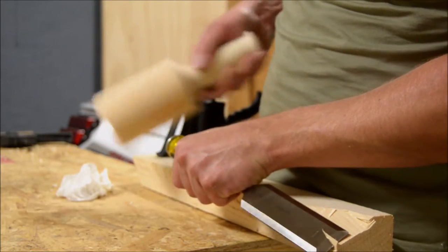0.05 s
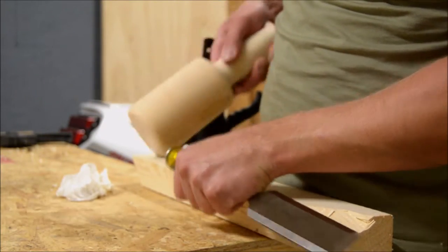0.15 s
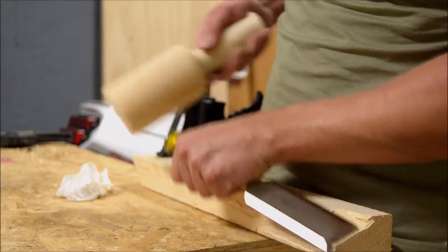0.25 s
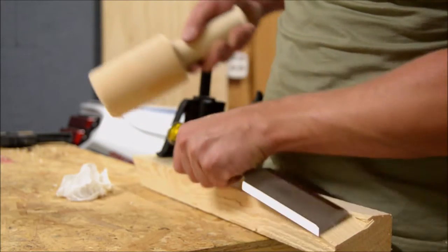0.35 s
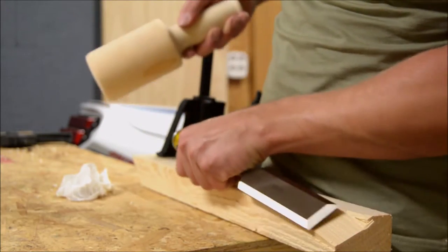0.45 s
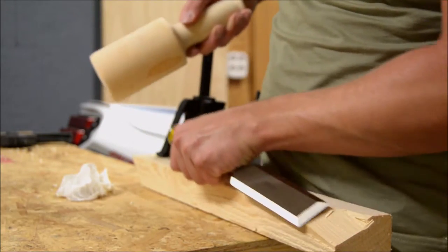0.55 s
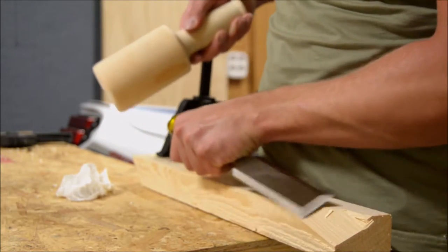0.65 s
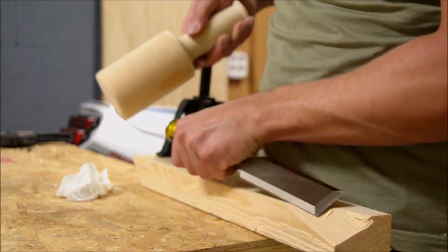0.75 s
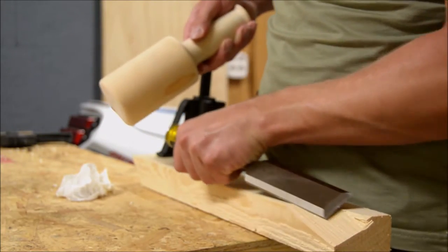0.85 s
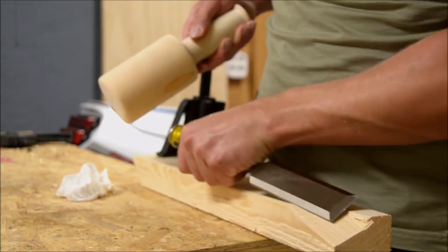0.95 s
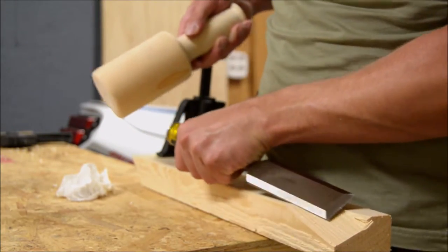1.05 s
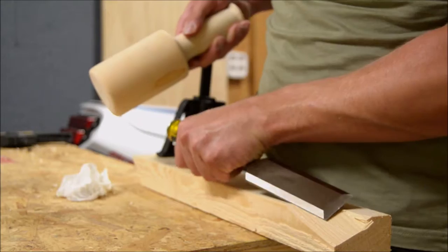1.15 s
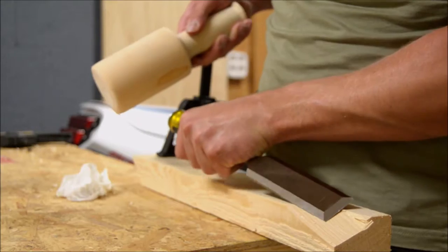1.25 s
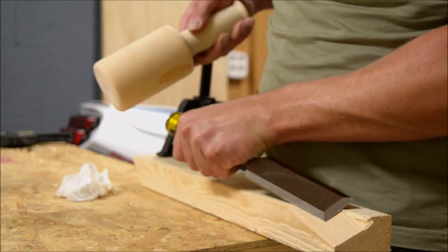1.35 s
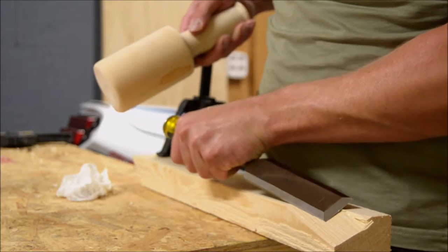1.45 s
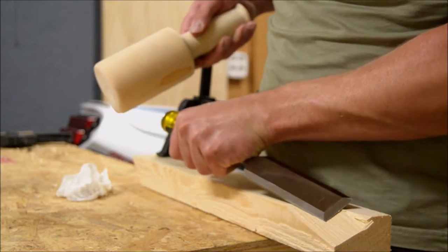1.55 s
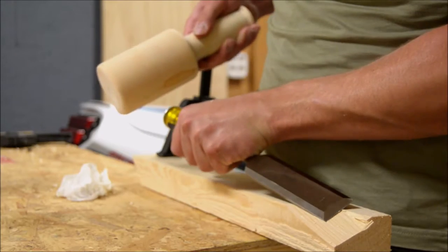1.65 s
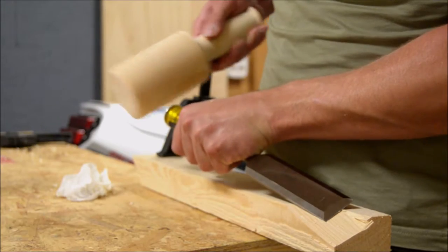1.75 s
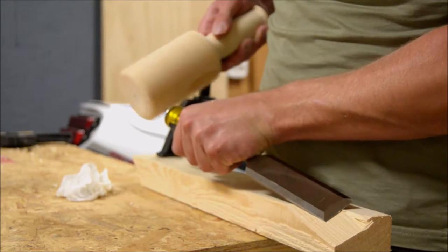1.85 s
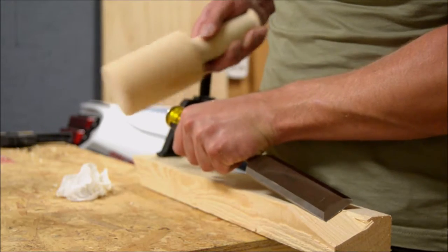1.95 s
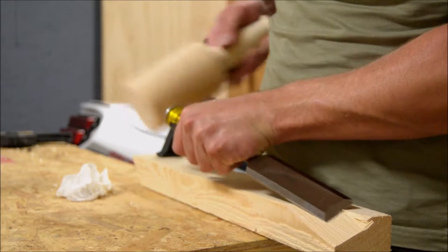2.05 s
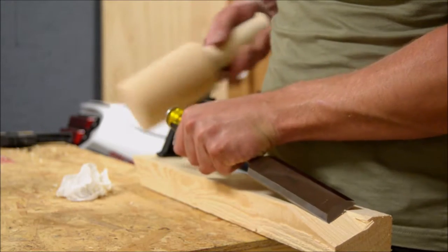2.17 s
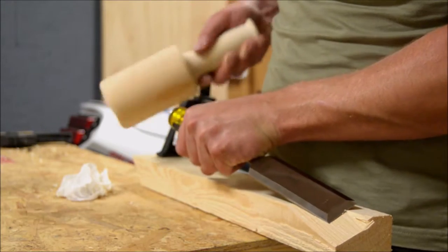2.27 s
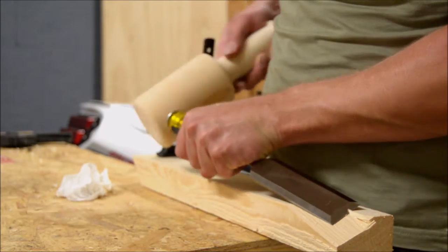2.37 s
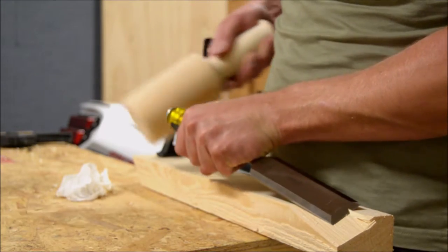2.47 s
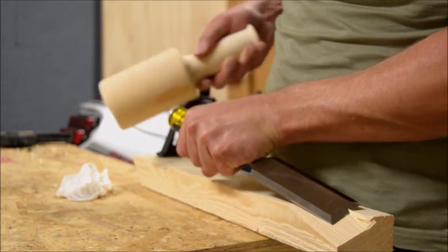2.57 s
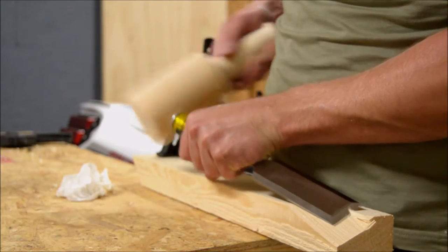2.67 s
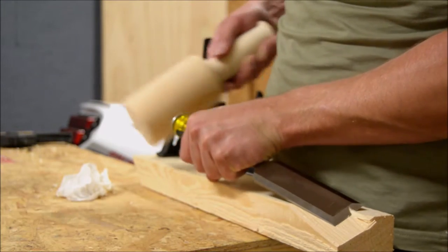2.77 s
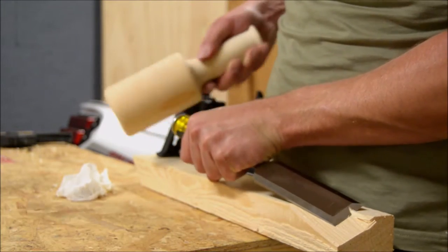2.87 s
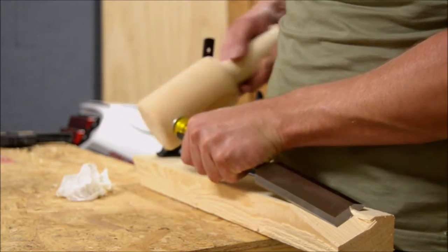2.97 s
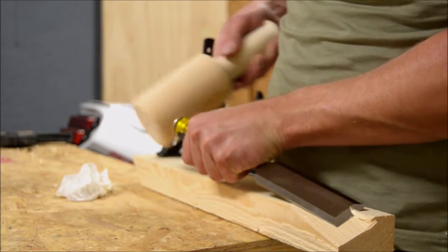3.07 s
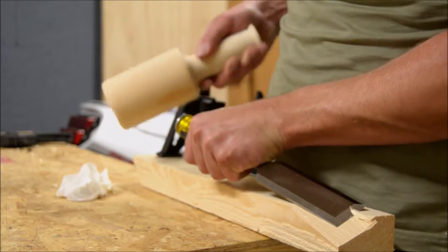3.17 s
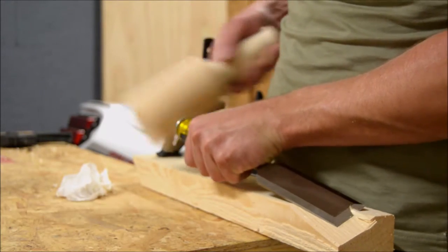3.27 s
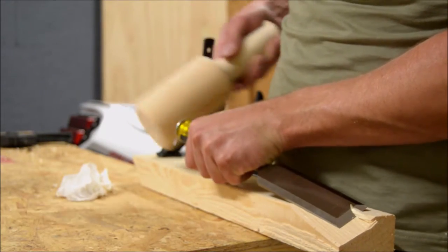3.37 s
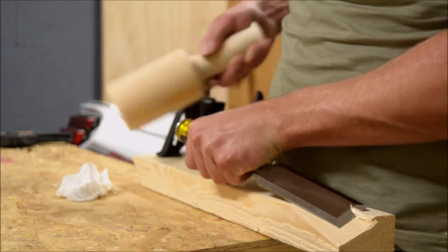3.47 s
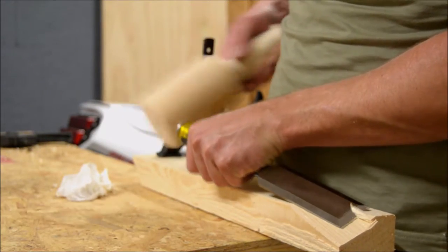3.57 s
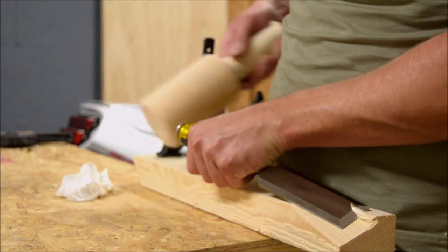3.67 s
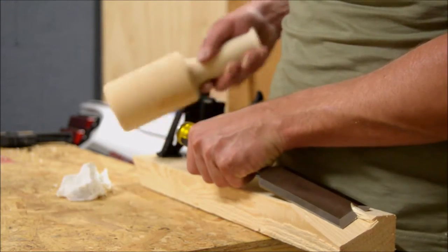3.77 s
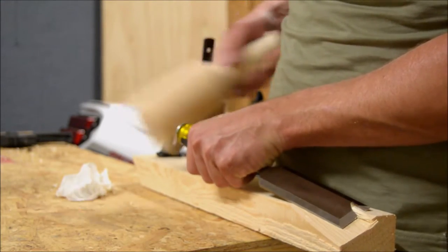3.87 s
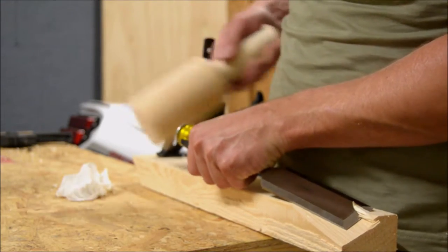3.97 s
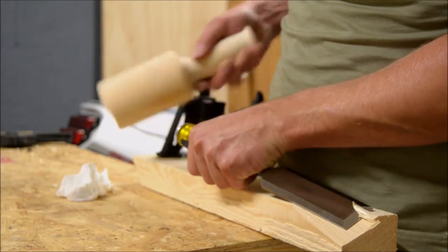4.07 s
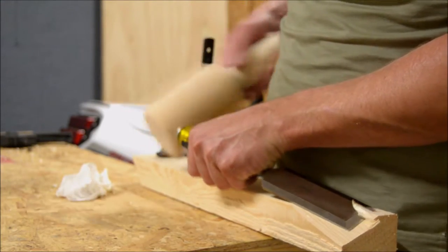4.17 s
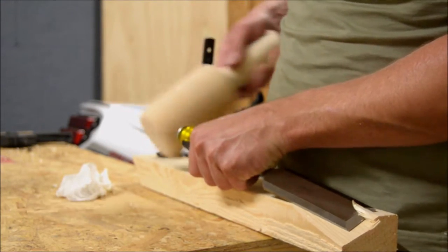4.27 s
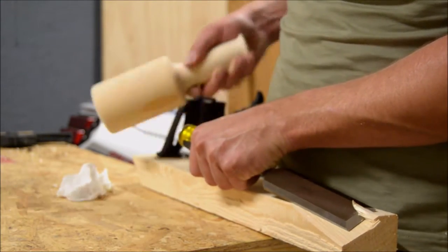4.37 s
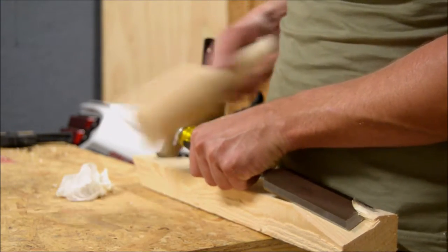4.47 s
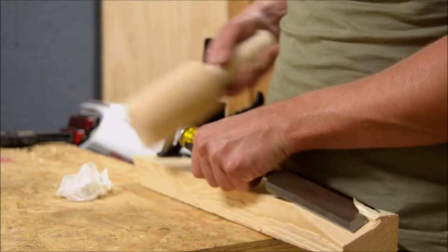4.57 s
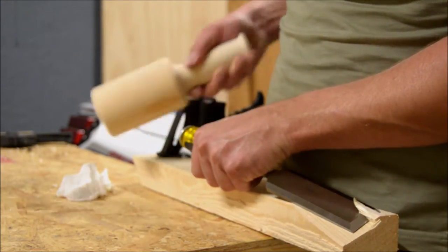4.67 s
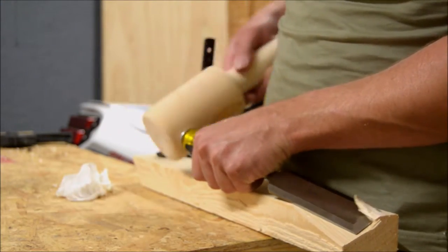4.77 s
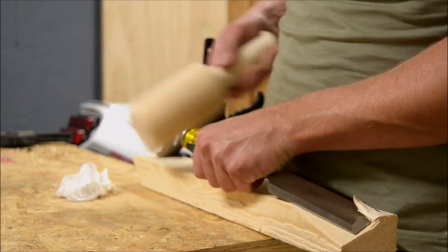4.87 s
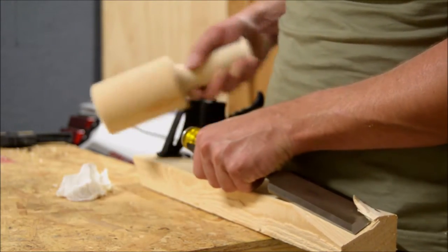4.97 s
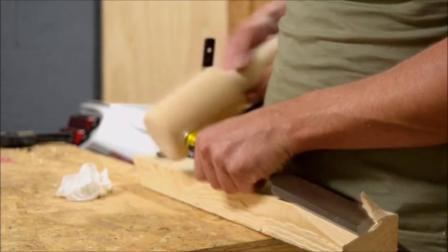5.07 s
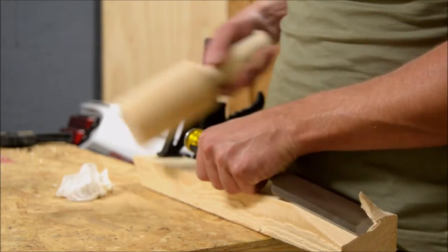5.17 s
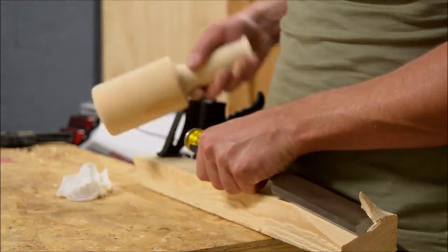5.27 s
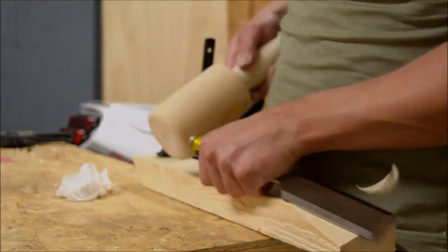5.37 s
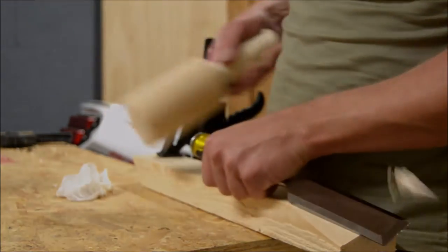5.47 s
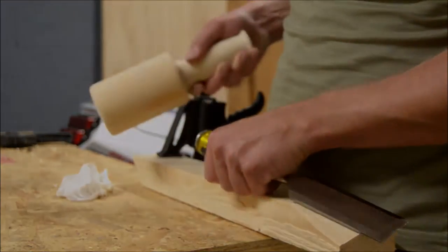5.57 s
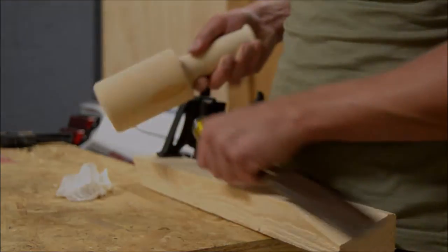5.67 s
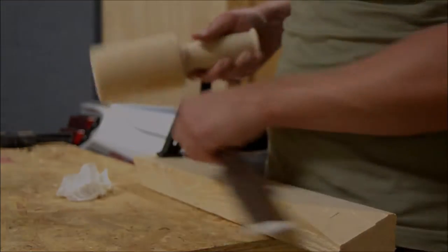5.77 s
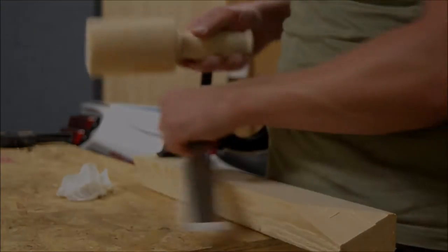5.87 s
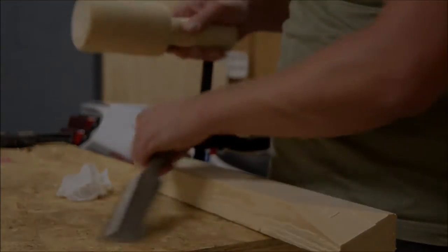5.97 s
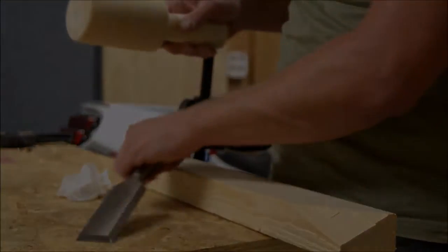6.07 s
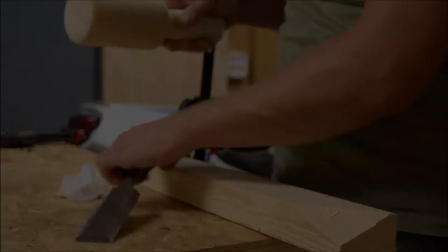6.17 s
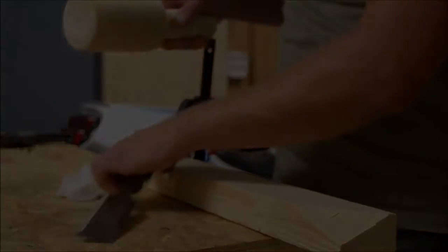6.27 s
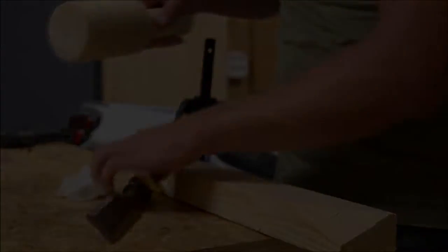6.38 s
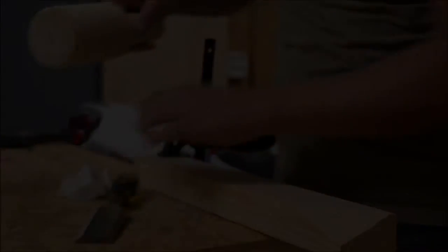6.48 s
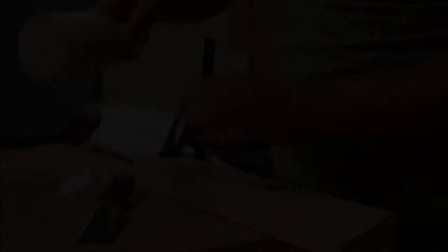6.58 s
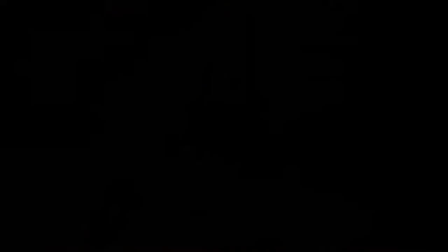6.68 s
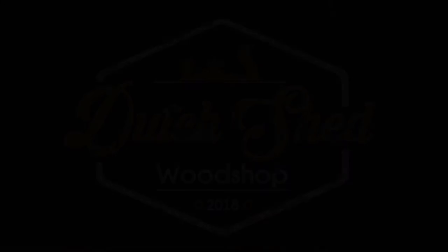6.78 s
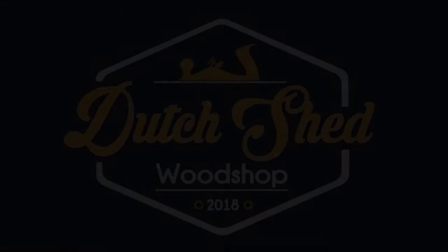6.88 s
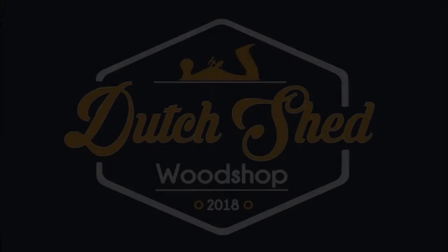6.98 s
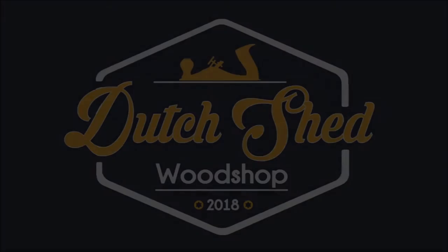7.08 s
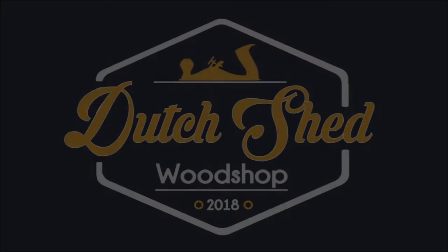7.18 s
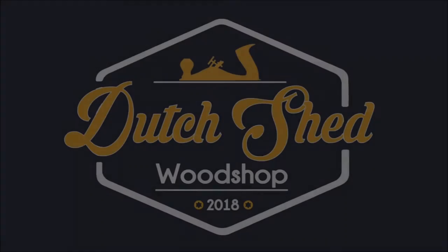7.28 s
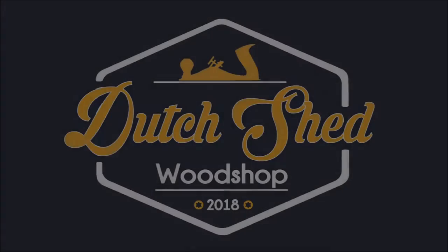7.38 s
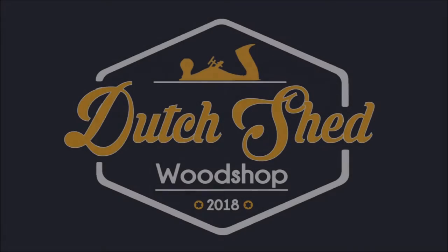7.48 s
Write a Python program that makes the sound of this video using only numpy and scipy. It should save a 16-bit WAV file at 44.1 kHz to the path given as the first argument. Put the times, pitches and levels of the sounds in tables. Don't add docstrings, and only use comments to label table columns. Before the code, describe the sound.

A wooden mallet knocks a chisel into a clamped beam, one lone blow, then a steady run, before the chip snaps off and tools are set down.

```python
import sys
import numpy as np
from scipy import signal
from scipy.fft import rfft, irfft
from scipy.io import wavfile

SR = 44100
rng = np.random.default_rng(int(sys.argv[2]) if len(sys.argv) > 2 else 0)


def dump(signal):
    limited = np.clip(np.atleast_2d(signal).T, -1, 1)
    pcm = np.round(limited * 32767).astype(np.int16)
    wavfile.write(sys.argv[1], SR, pcm)


def volts_from_decibels(level):
    exponent = np.asarray(level, float) / 20
    return 10 ** exponent


N = 332073
LEAD = SR // 2

# start_s, peak_db, contact_hardness_db, bite_into_grain_db, beam_boom_db
MALLET_BLOWS = [(0.0944, -10, -2.5, -3, -42), (2.0562, -16.5, 3.5, -18, -58.5),
                (2.3512, -14, -3.5, -6, -47.5), (2.6554, -15.5, -3, -28.5, -33),
                (2.962, -13.5, -4.5, -19.5, -28.5), (3.2701, -14, -0.4, -10, -28.5),
                (3.5727, -12, -1.5, -16.5, -26.5), (3.8668, -13, 1.1, 0.5, -25),
                (4.17, -14, 1.3, -1.8, -29), (4.4652, -12, 4, 2.5, -34.5), (4.7529, -13, 4.5, 5.5, -32.5),
                (5.0442, -13, 6, -1.4, -37), (5.3365, -15.5, 5.5, 2.5, -43)]
EARLIER_BLOW_S, EARLIER_BLOW_DB = -.205, -11
# pitch_hz, level_db, t60_s
WOOD_MODES = [(96.6, -3, 0.1), (207, -10, 0.009), (250, 2, .05), (357.3, 5, .06), (640, -14.5, 0.034),
              (826, -10, 0.011), (866, 2, 0.011), (978, -3.5, 0.015), (1232, -0.5, 0.0079),
              (1930, 10.5, 0.0033), (2200, 9.5, 0.0025), (2758, 9.5, 0.0036), (4196, 20, 0.0014),
              (5600, 9, 0.0025), (7140, 3, 0.0023), (7820, 10, 0.0019), (11400, -9, 0.0066),
              (12740, -12.5, .002)]
# pitch_hz, level_db, t60_s
BEAM_BOOM_MODES = [(132.5, -1.5, 0.22), (163, -2.5, 0.2), (371, -5, 0.24)]
# start_s, pitch_hz, level_db, t60_s
BLADE_RINGS = [(.094, 7000, -45.5, .04), (2.056, 8180, -50, .02), (2.656, 5430, -42, .05),
               (2.962, 5480, -42, .045), (3.270, 5500, -45, .04), (3.573, 5500, -43, .04),
               (4.170, 5500, -44, .05), (4.753, 5200, -48, .05), (4.753, 8200, -45, .045),
               (4.753, 4130, -45.5, .04), (5.340, 1750, -23, .045), (5.373, 1780, -28, .05),
               (5.340, 990, -24.5, .06), (5.372, 4480, -32.5, .015), (5.368, 8080, -38, .035),
               (5.376, 8200, -42, .02), (5.342, 1880, -29, .02), (5.374, 2480, -32, .012),
               (5.376, 1670, -28, .03), (5.372, 10940, -47, .008), (5.986, 4300, -44.5, .008),
               (5.986, 8300, -51, .01), (1.742, 1580, -62, .02)]
# pitch_hz, level_db, t60_s
BENCH_MODES = [(170, -8.5, 0.046), (248, -11, 0.14), (356, 1.5, 0.037), (474.5, 3, 0.054), (541, 9, 0.015),
               (757, -2.5, 0.035), (970, 6.5, .012), (1210, -1, 0.039), (1500.2, 7.5, 0.0046),
               (2080, 0, 0.015), (2750, -5, 0.0036), (3560, 1, 0.0036), (4300, 2, 0.0048),
               (6000, 0, 0.0012), (7880, -0.5, 0.0034), (11340, -11, 0.0045), (14010, -28, .002)]
# start_s, peak_db, thud_db, hardness_db, hollow_note_db
NEAR_KNOCKS = [
    (.615, -54.5, -8, 0.5, -20),
    (5.943, -62, -15.5, 9, -15.5),
    (6.3177, -22, -2, -21, -11.5),
    (6.4586, -18.5, -14.5, -2, -1),
]
# start_s, peak_db, thud_db, hardness_db, hollow_note_db
FAR_KNOCKS = [
    (.356, -58, 11, -17, 8.5),
    (.705, -54, 1, -18, 4.5),
    (.785, -58, -12, -19, -3),
    (1.193, -50.5, -2.5, -4.5, -12),
    (5.707, -51.5, 3, -0.5, 5.5),
    (5.981, -31.5, 1.2, -3, 5),
    (6.175, -38.5, 0.5, -14, 4),
]
# start_s, length_s, level_db, centre_hz, width_hz
WOOD_SCRAPES = [(0.259, 0.13, -59, 488, 402), (0.305, 0.06, -64.5, 170, 120), (0.713, 0.079, -68, 520, 400),
                (0.843, 0.31, -79.5, 750, 880), (5.363, 0.02, -60, 2200, 1980),
                (5.599, 0.22, -97, 10850, 4040), (5.712, 0.023, -85, 7270, 1500),
                (5.734, 0.057, -62, 580, 250), (5.703, 0.048, -75, 1860, 300),
                (5.939, 0.022, -66.5, 8700, 12000), (6.033, 0.11, -93, 11500, 5000),
                (6.22, 0.024, -76.5, 8800, 10990), (6.39, 0.047, -92, 10000, 6000)]
# pitch_hz, level_db, t60_s
LEG_MODES = [(42.2, 1.5, 0.72), (62.6, -8.5, 0.82), (92, -4, 0.87)]
# start_s, level_db
SET_DOWN_SWAY = [
    (6.318, -62.5),
    (6.458, -65.5),
]
# band_hz, t60_s
ROOM_T60 = [(60, 0.4), (160, 0.5), (420, 0.38), (1100, 0.36), (2900, 0.36), (7700, 0.28), (14000, 0.34)]
# band_hz, level_db
ROOM_COLOUR = [(60, -12), (200, 1.5), (500, 1.5), (1000, -3.5), (2000, 3), (4000, -3), (8000, -7.5),
               (15000, -6.5)]
# delay_s, level_db
NEAR_ECHOES = [(.0024, -8), (.0045, -16.5), (.0068, -14.5), (0.01, -8.5), (0.012, -11)]
# pitch_hz, level_db per Hz
HUSH_COLOUR = [(35, -19.5), (60, 7), (144, -5.5), (295, -3.5), (408, -2.5), (679, -4), (1080, -4),
               (1330, -8), (1750, -8.5), (2840, -14), (5680, -26.5), (15000, -36.5)]
HUSH_DB = -72

THUD_DB, LOW_BODY_DB, CRACK_DB, TICK_DB, SIZZLE_DB = -25.5, -6, -13, -24, -18.5
THUD_PER_HARD, TICK_PER_HARD, LOW_PER_BITE, SIZZLE_PER_BITE = -0.98, 0.87, -0.3, 0.36
TOUCH_LOSS_DB = 3.5
SWAY_DB, SWAY_PER_BOOM, SWAY_LATE_S = -46, 0.26, .012
KNOCK_TICK_DB, KNOCK_TICK_PER_HARD, KNOCK_MID_PER_HARD = -5, 1.86, 0.451
MALLET_CUT_HZ, BENCH_CUT_HZ, LEGS_CUT_HZ = 2500, 2200, 150
ECHO_CUT_HZ = 7900
MIC_LOW_HZ, MIC_HIGH_HZ, MIC_OFFSET = 94, 15300, .0003
END_S = 6.735


def mallet():
    earlier = (EARLIER_BLOW_S, EARLIER_BLOW_DB, *MALLET_BLOWS[0][2:])
    s, peak, hard, bite, boom = np.transpose([earlier] + list(MALLET_BLOWS))
    shares = [THUD_DB + THUD_PER_HARD * hard,
              LOW_BODY_DB + LOW_PER_BITE * bite,
              0,
              bite,
              CRACK_DB + hard,
              TICK_DB + TICK_PER_HARD * hard,
              SIZZLE_DB + SIZZLE_PER_BITE * bite]

    def level_db(hz):
        return peak + shares[np.searchsorted([500, 750, 1150, 1500, 3400, 6500], hz)]

    body = [mode for mode in WOOD_MODES if mode[0] < 2500]
    edge = [mode for mode in WOOD_MODES if mode[0] >= 2500]
    knock = soft(struck(s + .0001, lambda hz: level_db(hz) - 4, body, 2.5, facing), MALLET_CUT_HZ)
    treble_turns, treble_facing = [struck(s + .0003, lambda hz: level_db(hz) - 6.5, edge, 0.9, signs)
                          for signs in (taking_turns, facing)]
    touch_delays = np.cumsum(rng.uniform(.0001, .0006, (len(s), 4)), axis=1).T
    for k, late in enumerate(touch_delays):
        knock += struck(s + late, lambda hz: level_db(hz) - 7.0 - TOUCH_LOSS_DB * k, edge, 3.6, facing)
    push = struck(s + 0.0069, lambda hz: boom - 3.0, BEAM_BOOM_MODES, 2, lambda k, hz: (-1) ** k)
    rock = sway(s + SWAY_LATE_S, SWAY_DB + SWAY_PER_BOOM * boom, LEG_MODES)
    return knock, treble_turns, treble_facing, push, rock


def blade():
    return sum(struck([s], lambda hz: 0, [mode], 0, facing) for s, *mode in BLADE_RINGS)


def bench(knocks):
    s, peak, thud, hard, hollow = np.transpose(knocks)
    shares = [thud, hollow, 0, KNOCK_MID_PER_HARD * hard, hard, KNOCK_TICK_DB + KNOCK_TICK_PER_HARD * hard]

    def level_db(hz):
        return peak + shares[np.searchsorted([400, 600, 1100, 1500, 3400], hz)] - 4

    low = [mode for mode in BENCH_MODES if mode[0] < 1500]
    high = [mode for mode in BENCH_MODES if mode[0] >= 1500]
    thuds = soft(struck(s, level_db, low, 3.5, facing), BENCH_CUT_HZ)
    return thuds + struck(s, level_db, high, 1.5, taking_turns)


def scrapes():
    out = np.zeros(LEAD + N)
    for s, length, db, hz, width_hz in WOOD_SCRAPES:
        n, at = round(length * SR), LEAD + round(s * SR)
        chance, push, size = rng.random((3, SR // 2))[:, :n]
        slips = (chance < 4000 / SR) * (push - .5)
        rubbed = slips * volts_from_decibels(-2.5 * np.log(size + 1e-9)) * np.sqrt(np.hanning(n))
        r = np.exp(-np.pi * width_hz / SR)
        w = 2 * np.pi * min(hz, .4 * SR) / SR
        for twice in range(2):
            rubbed = signal.lfilter([1, 0, -1], [1, -2 * r * np.cos(w), r * r], rubbed)
        out[at:at + n] += volts_from_decibels(db) * rubbed / rubbed.std()
    return out


def sway(s, level_db, modes):
    return soft(struck(s, lambda hz: level_db, modes, 1.5, facing), LEGS_CUT_HZ)


def struck(times, level_db, modes, scatter_db, polarity):
    at = LEAD + np.round(np.asarray(times) * SR).astype(int)
    luck = rng.standard_normal((len(at), len(modes)))
    out = 0
    for k, (hz, db, t60) in enumerate(modes):
        clicks = np.zeros(LEAD + N)
        np.add.at(clicks, at, polarity(k, hz) * volts_from_decibels(level_db(hz) + db + scatter_db * luck[:, k]))
        out = out + ring(clicks, hz, t60)
    return out


def ring(clicks, hz, t60):
    r, w = volts_from_decibels(-60 / (t60 * SR)), 2 * np.pi * hz / SR
    return signal.lfilter([0, np.sin(w)], [1, -2 * r * np.cos(w), r * r], clicks + 1e-18)


def soft(x, cut_hz):
    return signal.sosfilt(signal.butter(2, cut_hz, fs=SR, output="sos"), x)


def facing(k, hz):
    return 1 if 500 < hz < 1500 else -1


def taking_turns(k, hz):
    return (-1) ** (k + 1)


def room(x, scattered, direct_db, wet_db, build_s):
    t = np.arange(SR) / SR
    white = rng.standard_normal((2, SR))
    edges = 30 * 2 ** np.arange(0, 9.6, .5)
    tail = 0
    for k, (low, high) in enumerate(zip(edges, edges[1:])):
        hz = np.sqrt(low * high)
        band = signal.sosfilt(signal.butter(2, [low, high], "band", fs=SR, output="sos"), white[k % 2])
        tail = tail + band * volts_from_decibels(at_hz(ROOM_COLOUR, hz) - 60 * t / at_hz(ROOM_T60, hz))
    near = np.zeros(SR // 20)
    for delay, db in NEAR_ECHOES:
        near[round(delay * SR)] = volts_from_decibels(db)
    near = signal.lfilter(*signal.butter(1, ECHO_CUT_HZ, fs=SR), near)
    near[0] += 1
    late = volts_from_decibels(wet_db) * tail * (1 - np.exp(-t / build_s))
    close_sound = volts_from_decibels(direct_db) * signal.oaconvolve(x, near)[:len(x)]
    return close_sound + signal.fftconvolve(scattered, late)[:len(x)]


def at_hz(points, hz):
    table_hz, values = np.transpose(points)
    return np.interp(np.log(hz), np.log(table_hz), values)


def shop_air():
    hz = np.fft.rfftfreq(N, 1 / SR) + 1
    hush = irfft(rfft(rng.standard_normal(N)) * volts_from_decibels(at_hz(HUSH_COLOUR, hz)), N)
    return volts_from_decibels(HUSH_DB) * hush / hush.std()


def scene():
    knock, treble_turns, treble_facing, push, rock = mallet()
    small = blade() + scrapes()
    near, far = bench(NEAR_KNOCKS), bench(FAR_KNOCKS)
    stance = np.sin(2 * np.pi * .9 * np.arange(LEAD + N) / SR)
    tools = push + room(knock + small, knock + treble_turns + small, direct_db=1.5, wet_db=-24, build_s=0.001)
    moving = knock * stance + volts_from_decibels(2.5) * treble_facing
    tools += room(knock, moving, direct_db=-41.5, wet_db=-29.5, build_s=0.0049)
    tools += room(near, near, direct_db=0.5, wet_db=-21.5, build_s=0.012)
    tools += room(far, far, direct_db=-6.5, wet_db=-21.5, build_s=0.011)
    tools = signal.sosfilt(signal.butter(2, MIC_LOW_HZ, "high", fs=SR, output="sos"), tools)
    tools += rock + sway(*np.transpose(SET_DOWN_SWAY), LEG_MODES[1:])
    return (tools[LEAD:] + shop_air())[None]


def top_cut(x):
    return signal.sosfilt(signal.butter(12, 17040, fs=SR, output="sos"), x)


def record(dry):
    t = np.arange(N) / SR
    over_db = np.maximum(20 * np.log10(np.abs(dry[0]) + 1e-9) + 15.2, 0)
    held_db = np.maximum.accumulate(over_db + 119.11 * t) - 120.8 * t
    keep = np.exp(-1 / (.003 * SR))
    duck_db = -.6 * signal.lfilter([1 - keep], [1, -keep], held_db)
    x = dry * volts_from_decibels(duck_db)
    x = x / (1 + (x / .49) ** 6) ** (1 / 6)
    x = (x + MIC_OFFSET) * np.clip((END_S - t) / 0.0015, 0, 1)
    x = signal.sosfilt(signal.butter(8, MIC_HIGH_HZ, fs=SR, output="sos"), x)
    return top_cut(x)


dry = scene()
out = record(dry)
dump(out)
```